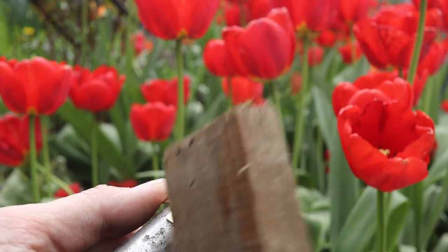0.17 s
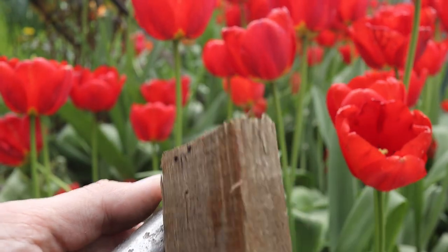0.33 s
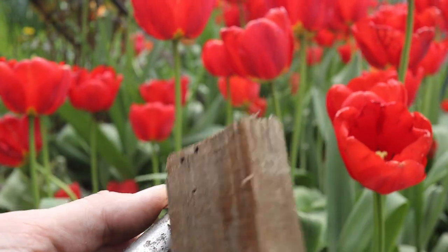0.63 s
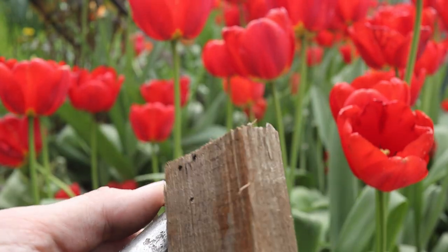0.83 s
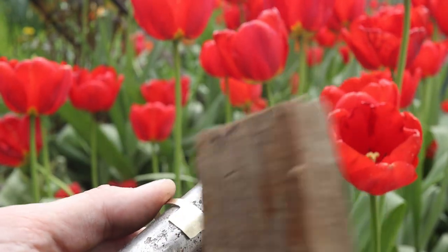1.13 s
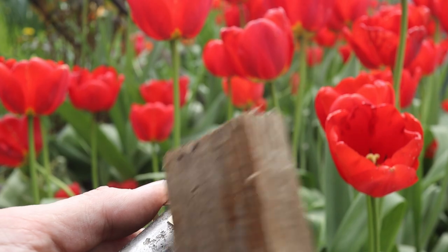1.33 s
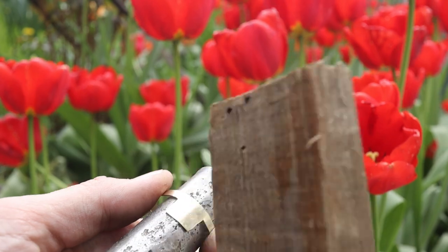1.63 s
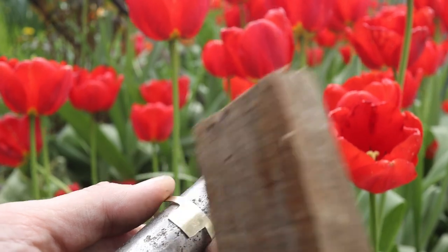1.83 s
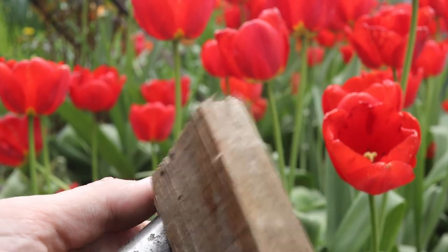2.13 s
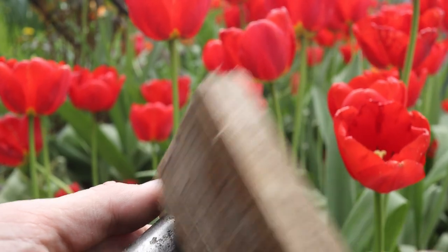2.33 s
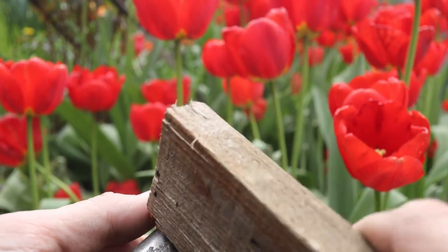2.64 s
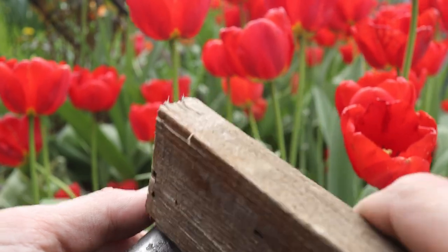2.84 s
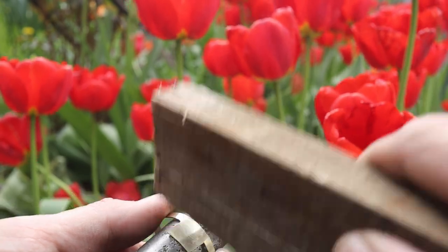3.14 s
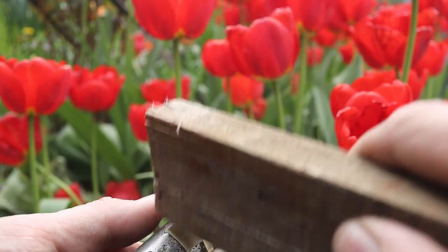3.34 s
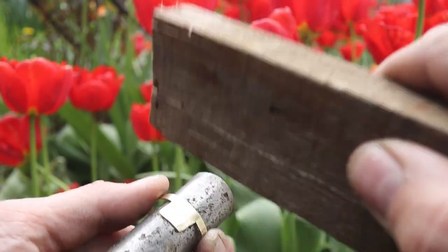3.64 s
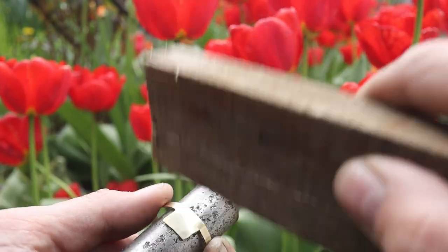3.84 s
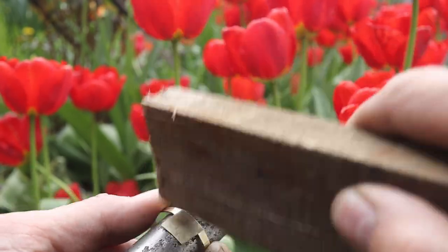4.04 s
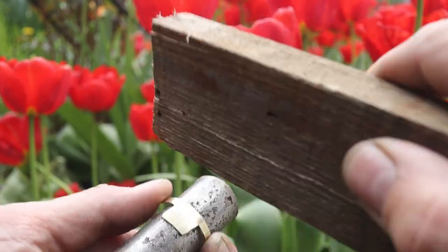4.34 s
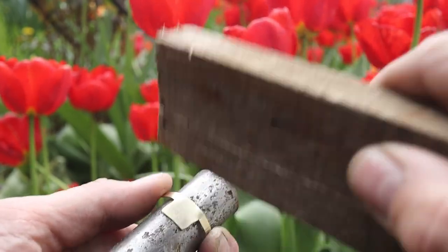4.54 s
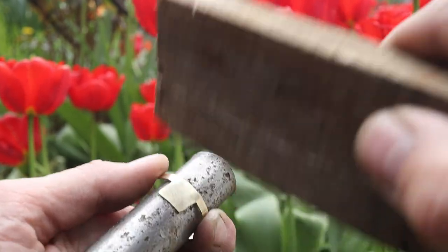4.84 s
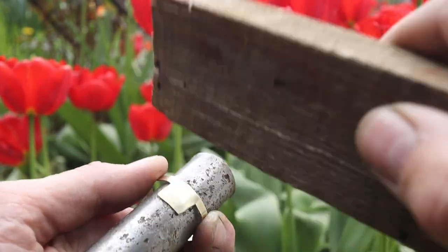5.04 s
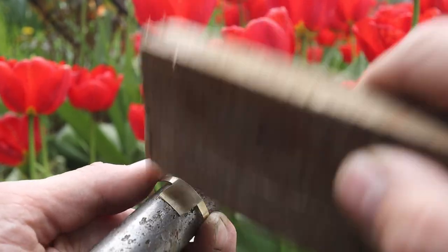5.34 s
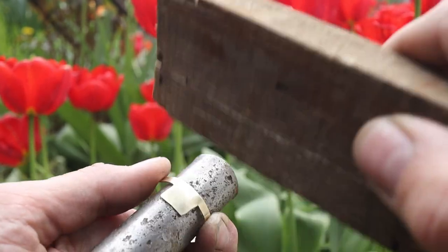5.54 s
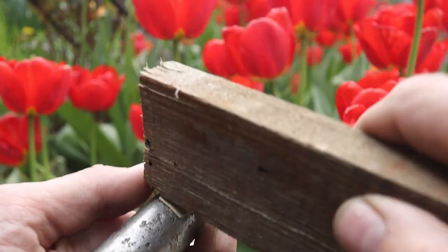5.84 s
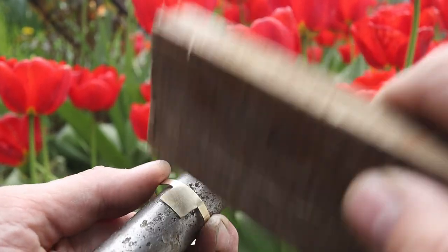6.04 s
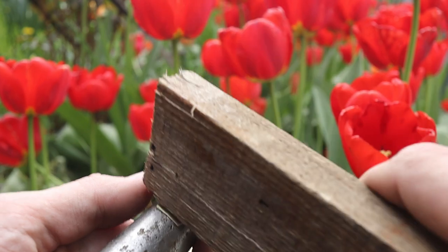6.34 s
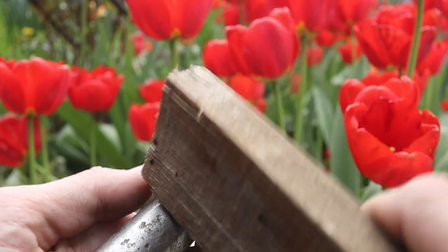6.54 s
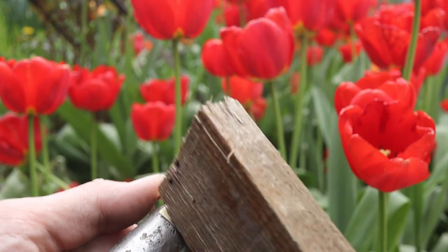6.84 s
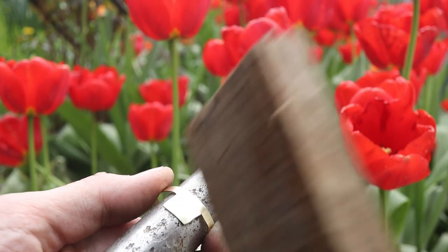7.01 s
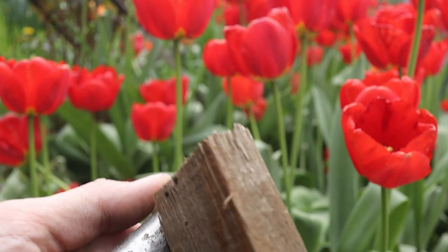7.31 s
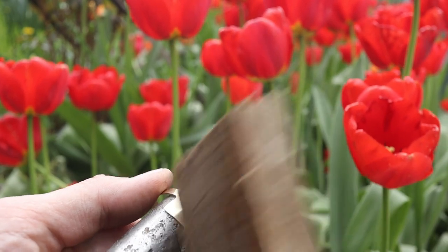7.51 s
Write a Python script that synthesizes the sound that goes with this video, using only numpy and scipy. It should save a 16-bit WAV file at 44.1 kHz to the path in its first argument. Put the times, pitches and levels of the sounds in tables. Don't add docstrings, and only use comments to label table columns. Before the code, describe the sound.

A wooden block taps briskly and evenly on a brass strip around a hand-held steel rod, dry knocks with metallic ticks over faint outdoor traffic.

```python
import sys
import numpy as np
from scipy import signal
from scipy.fft import rfft, irfft
from scipy.io import wavfile
from scipy.ndimage import uniform_filter1d

SR = 44100
rng = np.random.default_rng(int(sys.argv[2]) if len(sys.argv) > 2 else 0)


def invert_db(x):
    u = np.asarray(x, float) / 20
    return 10 ** u


def master_out(mix):
    frames = np.transpose(np.atleast_2d(mix))
    ceiling = np.clip(frames, -1, 1)
    pcm = np.round(ceiling * 32767).astype(np.int16)
    wavfile.write(sys.argv[1], SR, pcm)


N = 338247

# [t/s, knock peak level/dB, knock f/Hz, block face level/dB re knock, brass tick level/dB re knock]
TAPS = [(0.193, -10.5, 1250, -4, -3), (0.4305, -8.5, 1320, -13, -6),
        (0.6683, -10.5, 1353, -4, -6.5), (0.905, -15, 1210, -13, -5),
        (1.1278, -18.5, 920, -10, 2.5), (1.3541, -14, 1000, -11, 1.5), (1.578, -14.5, 963, -4, 5.5),
        (1.807, -18, 850, -10, 13.5), (2.0275, -7.5, 1320, -9, -2),
        (2.2492, -3.5, 1365, -16.5, -19.5), (2.4608, -4, 1370, -18.5, -20.5),
        (2.6791, -6, 1350, -28, -27.5), (2.901, -15, 832, -13.5, -11), (3.127, -9.5, 1000, -15, -5),
        (3.35, -15.5, 840, -7, -7.5), (3.5818, -15.5, 833, -6.5, 5),
        (3.8171, -10.5, 1133, -3.5, 1), (4.0468, -15.5, 840, -6, 0), (4.276, -10.5, 1040, -3, -3.5),
               (4.51, -11.5, 1050, -6, -1), (4.7482, -9.5, 1160, -13, -1), (4.9828, -10, 1220, -9.5, -2),
               (5.22, -10.5, 1200, -9, 0.5), (5.465, -10, 1154, -10.5, -4),
               (5.6992, -9.5, 1274, -12.5, -13), (5.939, -10, 1197, -7.5, -1),
               (6.1729, -11, 1267, -5.5, -5.5), (6.402, -12, 1240, -2, 0), (6.6494, -9, 1286, -7, -11),
               (6.9026, -11.5, 1118, -10, -8), (7.1517, -13, 1160, -9.5, -7.5), (7.3921, -15, 1300, 1.5, 1),
               (7.6337, -33.5, 1400, -11, -0.5)]
# [t/s, rod freedom level/dB re knock, landing away from the second node level/dB, main face f/Hz]
HOLD = [(.19, -45, 7, 2290), (.67, -35.5, -21, 2330), (.95, -32, -16, 2260), (1.35, -31, -19, 2260),
        (1.6, -36, 2.5, 2280), (2.03, -38, -9.5, 2374), (2.601, -35, -14, 2270), (3.0, -27.5, -3.5, 2256),
        (3.5, -38, 1.5, 2010), (3.82, -23.5, -2.5, 2240), (4.25, -18.5, -7.5, 2320), (4.8, -23.5, -4, 2140),
        (5.401, -25.5, -7.5, 2440), (5.75, -25.5, -9, 2252), (6.4, -25.5, -2, 2217),
        (6.899, -36, -4.5, 2340), (7.15, -33.5, -6, 2396), (7.63, -27.5, -20, 2350)]
FOLLOWS = {"thump": (-27.5, -0.07, 0, 0.13, 7.5), "low face": (-19, 1.12, 0.95, 0.75, 5),
           "high face": (-30, 0.77, 1.08, 0.2, -3), "edge": (-24, -0.1, 0.43, 0.67, 0),
           "third mode": (-63.5, -0.3, 0.2, 1.7, -4.5), "echo": (-51, 0.66, 0.33, 0.4, -3),
           "rattle": (-57.5, -0.2, -0.5, 0.72, -0.5), "bright": (7.5, -0.02, -0.18, 0.42, -3.5),
           "puff": (-47.5, 2.5, -0.25, -0.04, 2)}
# [first mode, second mode, brass brightness; dB per octave]
GLANCE_DB_PER_OCT = (6.5, 2, -2)
# [f/Hz, width/Hz, level/dB]
BRASS = [(5610, 2500, 1.5), (8320, 1200, 4), (10720, 3500, 8), (13600, 1300, -5), (15000, 1200, -17)]
# [f/Hz, level/dB, t60/s]
BLOCK = [(1700, -1, 0.0053), (2790, 4, 0.0084), (3833, -7, 0.01), (4997, -13, 0.011)]
# [level/dB re a tap's ring, gripped t60/s, freed t60/s]
ROD = [(11.5, .055, .2), (16.5, 0.05, 0.12), (8, 0.075, .12), (7, .035, .06)]
ROD_RISE_S = (.0022, .0008, .0012, .0006)
# [level/dB re first mode, t60/s]
ROD_LOW = (-7.5, 0.09)
# [delay t/s, level/dB re wall echo]
ECHOES = [(.0092, 14.5), (0.0163, -10), (0.034, -22)]
# [delay t/s, level/dB]
MIRRORS = [(0.0197, -30), (.038, -36)]
# [t/s, peak level/dB, centre f/Hz]
TICKS = [
    (1.516, -51, 9500),
    (2.412, -54.5, 1700),
    (6.375, -56.5, 4570),
    (6.842, -55, 3030),
    (7.652, -50, 6920),
]
# [t/s, length/s, f/Hz, width/Hz, level/dB]
FAR = [(0, .13, 238, 20, -48), (.46, .13, 560, 15, -58), (3.757, .053, 1008, 14, -59),
       (3.95, .28, 1400, 37, -70), (4.55, .95, 585, 40, -66), (3.65, .8, 590, 40, -69),
       (6.808, .033, 6000, 980, -74.5), (6.856, .035, 6000, 900, -73), (6.9, .75, 436, 50, -67),
       (0, 7.4, 58.5, 27, -63), (.33, .03, 3270, 280, -71), (.365, .02, 3480, 200, -68),
       (0, 2.2, 412, 30, -68), (.3, 1.22, 244, 24, -60)]
# [f/Hz, level/dB per Hz]
TOWN = [(18, -36), (30, -4.5), (55, 7), (135, -1.5), (248, -2), (350, -8.5), (432, -7), (752, -21),
        (1270, -20.5), (2670, -35.5), (3860, -36), (14500, -41), (16500, -50)]
# [t/s, gain level/dB, traffic level/dB]
GAIN = [(0, 8, -3.5), (.36, 4, 1.9), (.92, 1.5, -.5), (1.15, 3, -0.5), (1.54, 5, 0), (1.9, 4.5, 2),
        (2.2, 3, -2.5), (2.71, -2, 0.5), (3.25, -1.5, -1.5), (3.6, .8, 2.5), (3.93, 0, -4),
        (4.62, 0.1, 1.5), (5.04, -1.5, 2), (5.6, -0.7, 3), (6.3, -3, 3), (6.88, -6, -1.5), (7.39, -5, 1.5),
        (7.67, -5.5, 5)]
# [rumble, drone, road, hiss; level/dB]
AIR_DB = (-58.5, -57.5, -64.5, -70.5)
# [slope/dB per dB of gain, of traffic]
AIR_SLOPE = [(1.3, 0.99), (1, .3), (0.87, .1), (1.02, .02)]

AIR_BANDS_HZ = [(15, 130), (130, 600), (600, 2600), (2600, 17000)]
SWELL_DB, FLICKER_DB = (1.6, .8, .5, .3), (1.3, 1.3, .8, .4)
ROD_HZ, TWIN_RATIO, ROD_LOW_HZ = (1297, 3348, 5950, 12500), 1.008, 517
BOUNCE_DB, GRAIN_DB, GRIP_DB = 2., 1.5, 1.5
MEAN_KNOCK_DB, MEAN_FACE_DB, MEAN_TICK_DB = -11, -20, -15
UPRIGHT_TILL_S, EDGE_ON_S, EDGE_LATE_S = 1.9, (.8, 1.9), .0009
THUMP_SINKS_DB_PER_S = -0.7
SPAN = int(.16 * SR)
LEAD_S = .001
INPUT_LIMIT = .45


def unit(x):
    return x / np.sqrt(np.mean(x ** 2))


def fade(t, t60, rise=1e-5):
    t = np.maximum(t, 0)
    return (1 - np.exp(-t / rise)) * np.exp(-np.log(1000) * t / t60)


def mode(t, hz, t60, rise):
    return np.sin(2 * np.pi * hz * np.maximum(t, 0)) * fade(t, t60, rise)


def band(x, hz, width_hz):
    return signal.lfilter(*signal.iirpeak(min(hz, .45 * SR), hz / width_hz, SR), x)


def flutter(count, depth_db, size=70):
    wander = uniform_filter1d(rng.standard_normal((count, SPAN)), size=size)
    return invert_db(depth_db * unit(wander))


def place(times, sounds):
    out = np.zeros(N + SPAN)
    for s, sound in zip(times, sounds):
        start = int(s * SR)
        out[start:start + len(sound)] += sound
    return out[:N]


def taps():
    s, knock_db, hz, face_re_knock, tick_re_knock = np.array(TAPS).T[:, :, None]
    face_db, tick_db = knock_db + face_re_knock, knock_db + tick_re_knock
    hold_s, *hold = np.transpose(HOLD)
    free_db, second_db, face_hz = (np.interp(s, hold_s, column) for column in hold)
    first_glance, second_glance, bright_glance = (db * np.log2(hz / hz.mean()) for db in GLANCE_DB_PER_OCT)

    law = {}
    for name, (db, per_knock, per_face, per_tick, upright_db) in FOLLOWS.items():
        law[name] = (db + per_knock * (knock_db - MEAN_KNOCK_DB) + per_face * (face_db - MEAN_FACE_DB)
                     + per_tick * (tick_db - MEAN_TICK_DB) + upright_db * (s < UPRIGHT_TILL_S))
    thump_db = law["thump"] + THUMP_SINKS_DB_PER_S * (s - N / SR / 2)
    mode_db = np.hstack([law[part] - face_db for part in ("low face", "high face", "edge")])
    ring_db = np.hstack([knock_db + free_db + first_glance,
                         knock_db + free_db + second_db + second_glance,
                         law["third mode"] + 0.53 * (free_db + 33)])
    edge_on = (s > EDGE_ON_S[0]) & (s < EDGE_ON_S[1])

    t = np.arange(SPAN) / SR - LEAD_S
    sound = invert_db(knock_db) * wood(t, hz, thump_db - knock_db, face_re_knock, face_hz, mode_db, edge_on)
    sound += brass(t, tick_db, law["rattle"], law["bright"] + bright_glance)
    sound += rod(t, ring_db) + garden(t, law["echo"])
    small = signal.butter(3, 225, "high", fs=SR, output="sos")
    sound = mirrored(signal.sosfilt(small, sound)) + hands(t - LEAD_S, thump_db, law["puff"])
    return place(s[:, 0] - LEAD_S - .0001, sound)


def wood(t, hz, thump_db, face_db, face_hz, mode_db, edge_on):
    pitch = np.exp(.02 * rng.standard_normal((len(hz), len(BLOCK) + 1)))
    late = t - EDGE_LATE_S * edge_on
    contact = (np.pi * hz * late) ** 2
    knock = invert_db(2.0) * (1 - 2 * contact) * np.exp(-contact)
    knock -= invert_db(-2) * mode(late - 0.46 / hz, hz, 0.0034, 0.00051)
    face = mode(t, face_hz, 0.0084, 0.00068) + invert_db(-28) * mode(t, 0.93 * face_hz, .07, .002)
    for k, (f, db, t60) in enumerate(BLOCK):
        level_db = db + mode_db[:, [min(k, 2)]]
        face += invert_db(level_db) * mode(t, f * pitch[:, [k]], t60, 0.0011)
    thump = mode(t + 0.0011, 295 * pitch[:, -1:], 0.018, 0.0025)
    return np.where(edge_on, -knock, knock) + invert_db(face_db + 10) * face + invert_db(thump_db + 8) * thump


def brass(t, tick_db, rattle_db, bright_db):
    grit = rng.standard_normal((len(tick_db), SPAN))
    snap = fade(t + .0006, 0.0017, 0.000067)
    snap += invert_db(-10) * fade(t, 0.011, 0.0013)
    snap += invert_db(-32.5) * fade(t - ECHOES[0][0], 0.0073, 3e-4)
    rattle = fade(t, 0.019, 0.0025) + invert_db(-16.5) * fade(t, 0.18, .005)
    rattle = rattle * flutter(len(grit), BOUNCE_DB)

    def resonate(part):
        return unit(sum(invert_db(db) * band(band(grit, hz, w), hz, 2 * w) for hz, w, db in part))

    dull, bright = resonate(BRASS[:2]), resonate(BRASS[2:])
    share = 1 / (1 + invert_db(-2 * (bright_db - 5.0)))
    metal = np.sqrt(1 - share) * dull + np.sqrt(share) * bright
    return metal * (invert_db(tick_db + 5.0) * snap + invert_db(rattle_db + 18.0) * rattle)


def rod(t, ring_db):
    pitch = np.exp(.002 * rng.standard_normal((len(ring_db), len(ROD))))
    ring = invert_db(ring_db[:, [0]] + ROD_LOW[0]) * mode(t, ROD_LOW_HZ, ROD_LOW[1], 0.00067)
    for k, (hz, (db, gripped, freed), rise) in enumerate(zip(ROD_HZ, ROD, ROD_RISE_S)):
        pair = mode(t, hz * pitch[:, [k]], gripped, rise)
        pair = pair + invert_db(-24) * mode(t, TWIN_RATIO * hz, freed, 0.0036)
        ring = ring + invert_db(ring_db[:, [min(k, 2)]] + db) * pair
    return ring * flutter(len(ring), GRIP_DB, size=250)


def hands(t, thump_db, low_pulse_db):
    noise = rng.standard_normal((len(thump_db), SPAN))
    flesh = unit(band(band(noise, 235, 200), 235, 260) + invert_db(-9) * band(noise, 340, 250))
    shudder = flesh * fade(t, .09, 0.0022)
    return invert_db(thump_db - 11.5) * shudder + invert_db(low_pulse_db) * np.exp(-(t / 0.0046) ** 2)


def garden(t, echo_db):
    noise = rng.standard_normal((len(echo_db), SPAN))
    colour = band(band(noise, 1800, 1500), 1800, 2900)
    colour += invert_db(-3.5) * band(band(noise, 1000, 700), 670, 1400)
    colour += invert_db(-13.0) * band(band(noise, 3500, 3000), 4500, 5200)
    colour += invert_db(4.5) * band(noise, 500, 300)
    slaps = sum(invert_db(db) * fade(t - s, 0.0039, 6e-4) for s, db in ECHOES)
    tail = fade(t, 0.065, .0007) + invert_db(-19.0) * fade(t, 0.3, 0.0032)
    returns = flutter(len(noise), GRAIN_DB) * tail + invert_db(-6.6) * slaps
    return invert_db(echo_db + 14) * unit(colour) * returns


def mirrored(sound):
    dull = band(sound, 1900, 2600)
    out = sound.copy()
    for s, db in MIRRORS:
        rough = rng.standard_normal((len(sound), 200)) * fade(np.arange(200) / SR, .006, 3e-4)
        rough /= np.linalg.norm(rough, axis=1, keepdims=True)
        smeared = signal.fftconvolve(dull, rough, axes=1)
        out += invert_db(db) * np.pad(smeared, ((0, 0), (int(s * SR), 0)))[:, :SPAN]
    return out


def ticks():
    t = np.arange(2000) / SR
    clicks = []
    for _, db, hz in TICKS:
        noise = rng.standard_normal(len(t))
        clicks.append(invert_db(db) * unit(band(noise, hz, 0.83 * hz)) * fade(t, 0.013, 0.00016))
    return place([s for s, _, _ in TICKS], clicks)


def far_tones():
    out, t = np.zeros(N), np.arange(N) / SR
    for s, length, hz, width, db in FAR:
        since = t - s + .2 * length * (s == 0)
        swell = np.clip(np.minimum(since, s + length - t) / (0.083 * length), 0, 1)
        tone = swell * band(band(rng.standard_normal(N), hz, width), hz, width)
        out += invert_db(db) * unit(tone) * np.sqrt(np.mean(swell ** 2))
    return out


def walk(rate):
    k = int(SR / rate)
    steps = np.repeat(rng.standard_normal(N // k + 1), k)
    return 1.5 * uniform_filter1d(uniform_filter1d(steps, k), k)[:N]


def air():
    t, out, swell = np.arange(N) / SR, np.zeros(N), walk(5)
    s, *controls = np.transpose(GAIN)
    gain_db, traffic_db = (np.interp(t, s, column) for column in controls)
    freq = np.maximum(np.fft.rfftfreq(N, 1 / SR), 1)
    town_hz, town_db = np.transpose(TOWN)
    spectrum = rfft(rng.standard_normal(N)) * invert_db(np.interp(np.log(freq), np.log(town_hz), town_db))
    layers = zip(AIR_BANDS_HZ, AIR_DB, AIR_SLOPE, SWELL_DB, FLICKER_DB)
    for (lo, hi), db, (per_gain, per_traffic), swell_db, flicker_db in layers:
        cuts = np.geomspace(lo, hi, num=5)
        layer = sum(invert_db(flicker_db * walk(4.1)) * irfft(spectrum * ((freq >= a) & (freq < b)), N)
                    for a, b in zip(cuts, cuts[1:]))
        level_db = db + per_gain * gain_db + per_traffic * traffic_db
        out += invert_db(level_db + swell_db * swell) * unit(layer)
    return out


def scene():
    return (taps() + ticks() + far_tones() + air())[None]


def low_pass(x):
    return signal.sosfilt(signal.butter(12, 16880, fs=SR, output="sos"), x)


def record(dry):
    top = signal.cheby2(10, 55, 17050, fs=SR, output="sos")
    clipped = np.clip(dry, -INPUT_LIMIT, INPUT_LIMIT)
    return low_pass(signal.sosfilt(top, clipped))


dry = scene()
out = record(dry)
master_out(out)
```